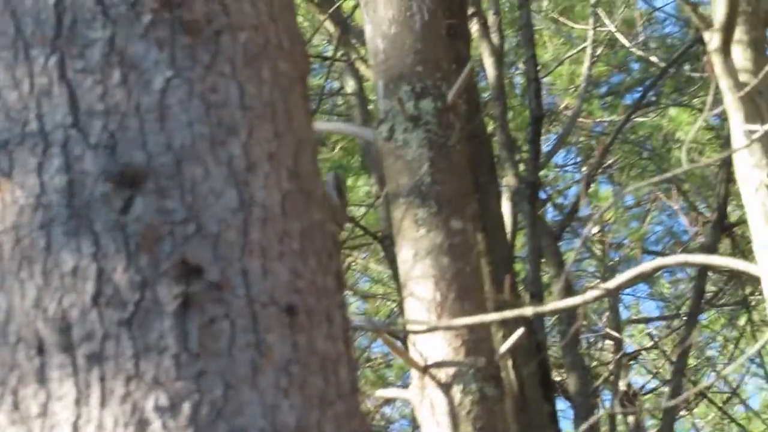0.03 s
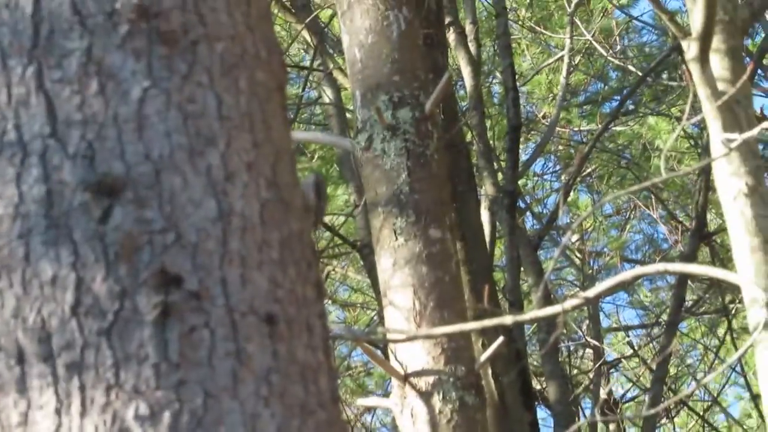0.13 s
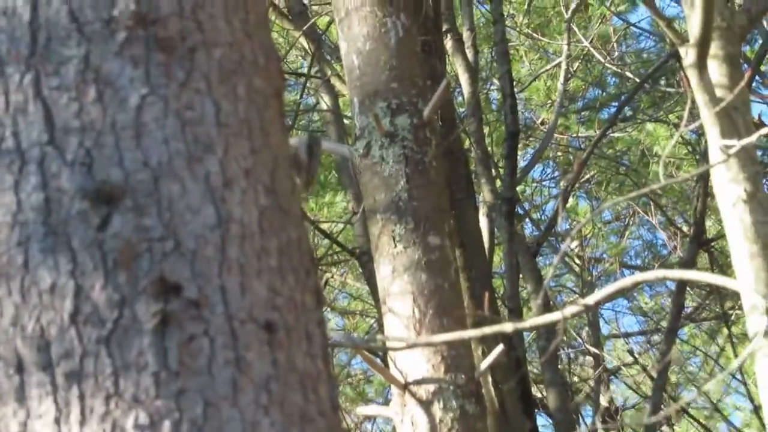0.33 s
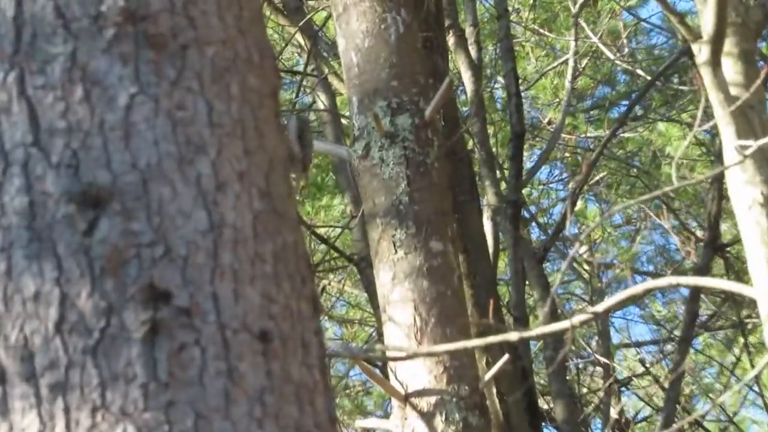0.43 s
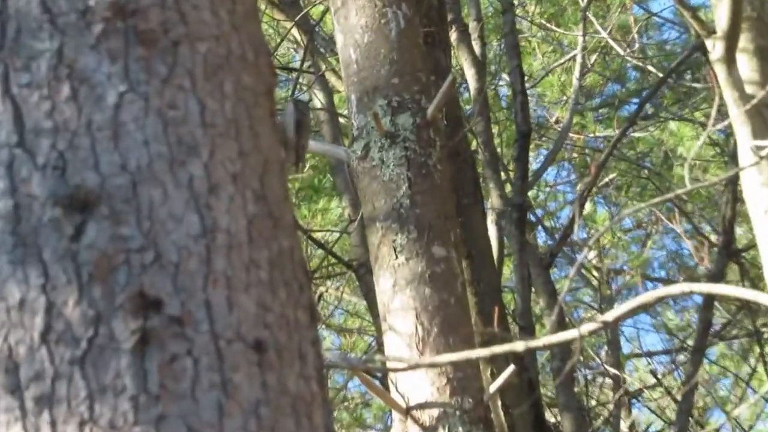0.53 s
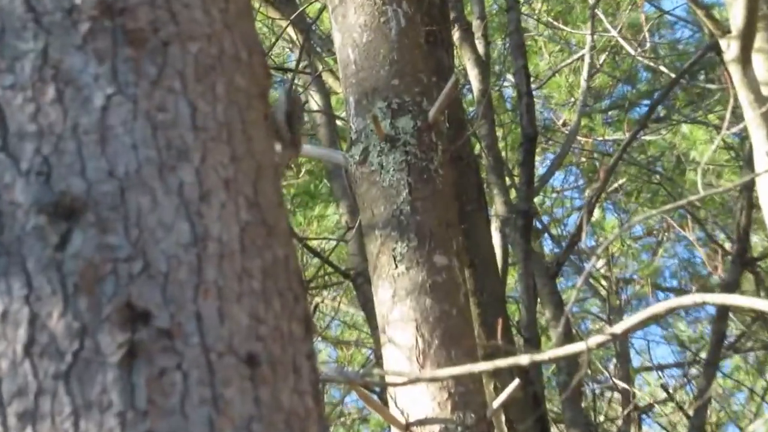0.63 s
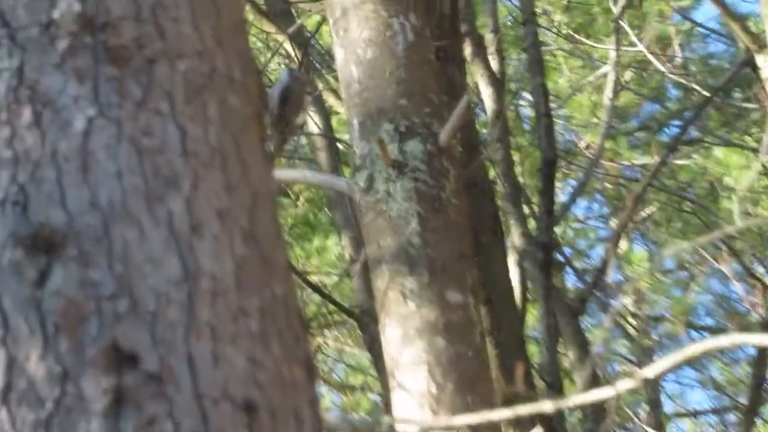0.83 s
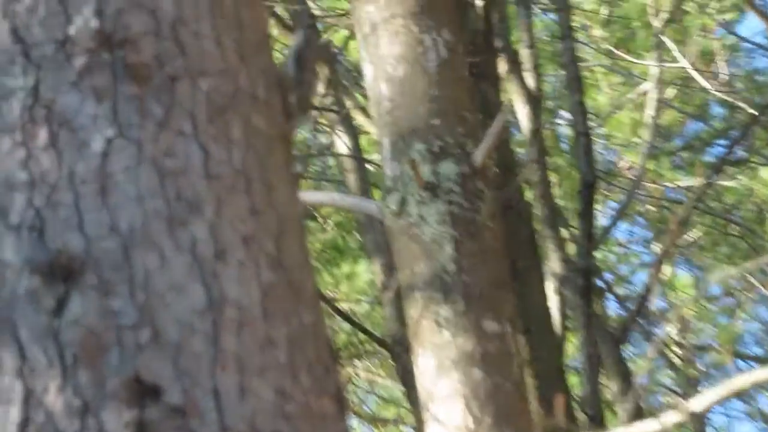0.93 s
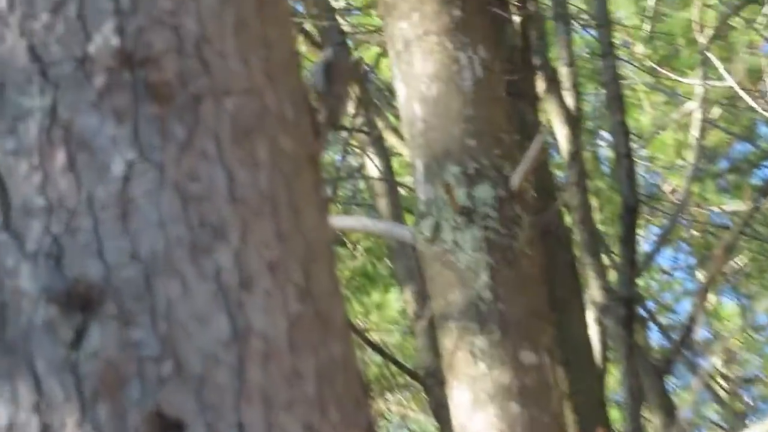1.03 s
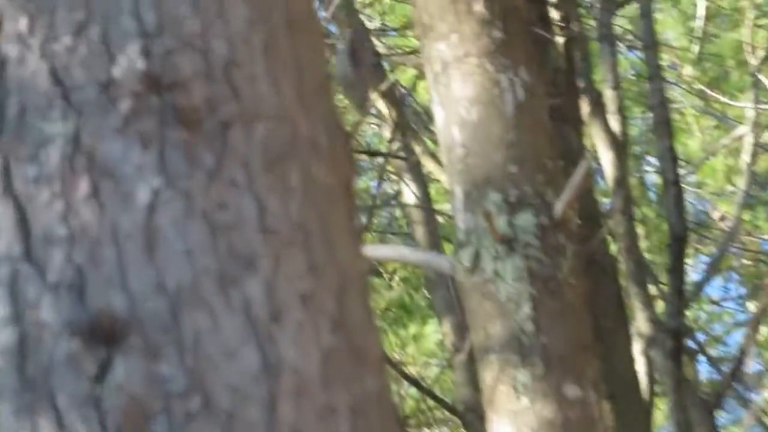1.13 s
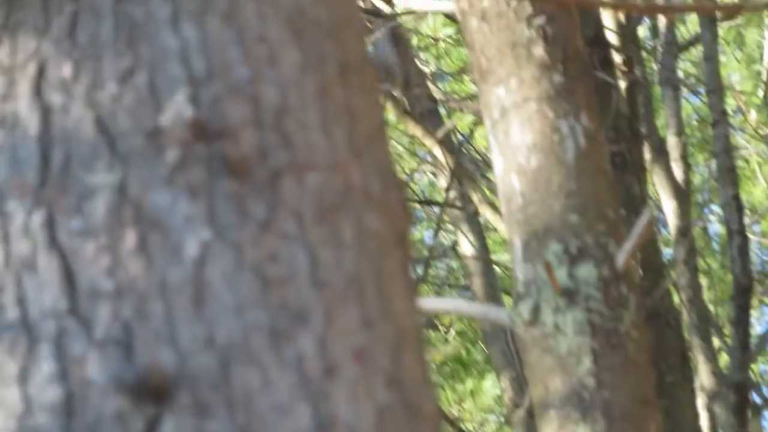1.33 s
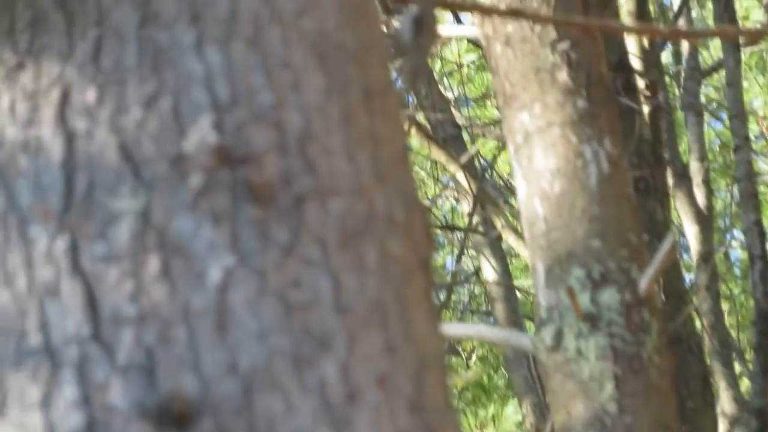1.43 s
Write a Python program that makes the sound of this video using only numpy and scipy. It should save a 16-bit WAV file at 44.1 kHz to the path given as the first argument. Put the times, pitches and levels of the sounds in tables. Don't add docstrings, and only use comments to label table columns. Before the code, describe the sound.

A camera's zoom lever gives one loud, sharp plastic snap at 0.42 seconds, bouncing briefly. Before it, from 0.1, fingers creak and tick on the casing; dull thuds peak near 0.5. Sound dips briefly, then from 0.56 a quiet motor knocks and whirrs rapidly, ending around 1.37 with a small tick. Wide low outdoor rumble, distant engine drone, faint hiss and fading leaf rustle lie underneath.

```python
import sys
import numpy as np
from scipy import signal
from scipy.fft import rfft, irfft, next_fast_len
from scipy.io import wavfile
from scipy.ndimage import uniform_filter1d, map_coordinates

SR = 44100
rng = np.random.default_rng(int(sys.argv[2]) if len(sys.argv) > 2 else 0)


def transcribe(signal):
    frames = np.atleast_2d(signal).T
    limited = np.clip(frames, -1, 1)
    pcm = np.round(limited * 32767).astype(np.int16)
    wavfile.write(sys.argv[1], SR, pcm)


def invert_db(x):
    u = np.asarray(x, float) / 20
    return 10 ** u


N = 66150

# (frequency [Hz], level [dB per Hz])
RUMBLE_MID = [(13, -48), (22, -39), (43, -3), (75, -8), (109, -4), (299, -9), (474, -14), (540, -15),
              (690, -36.5), (900, -80), (1520, -120)]
RUMBLE_SIDE = [(13, -42), (22, -13), (81, -7), (168, -4.5), (291, -9.5), (326, -9.5), (355, -8.5),
               (540, -15.5), (690, -30), (900, -63), (1520, -120)]
AIR_MID = [(400, -17), (680, -22), (815, -5), (904, -4.5), (1080, -6), (1890, -22), (6640, -28.5),
           (8160, -18.5), (14000, -20.5), (15000, -23.5)]
AIR_SIDE = [(400, -40), (680, -62), (764, -16), (964, -9.5), (1820, -31), (8710, -38.5), (12500, -43.5),
            (13400, -35), (15000, -50)]
# (middle [dB], side [dB])
RUMBLE_DB = [-56, -49.5]
AIR_DB = [-62.5, -62]
RUMBLE_GROWS_DB_PER_S = 2.2
# (frequency [Hz], level [dB per Hz])
LEAVES = [(1200, -34), (1900, 4.5), (3000, -8), (5000, -5), (7000, -7), (9000, -35)]
# (time [s], level [dB])
BREEZE = [
    (0, -67.5),
    (.5, -64.5),
    (1, -78),
    (1.5, -73),
]
# (frequency [Hz], width [Hz], level [dB])
ENGINE = [(95.8, 10, -63), (121, 8.4, -66.5)]

# (frequency [Hz], width [Hz], level [dB])
LOW = [(348, 150, -1), (506, 113, -7.5), (1030, 600, -9), (1522, 220, 3.5), (1674, 86, -5.5)]
SHELL = [(2244, 360, 0)]
MIDDLE = [(2610, 120, 2), (3096, 174, -2), (3730, 130, -10)]
BRIGHT = [(6400, 530, -4), (7540, 440, -1.5), (8600, 270, -3), (9600, 790, -4)]
TOP = [(10270, 200, -0.5), (11440, 160, -1.5), (12080, 146, 4), (13000, 780, -8.5), (13600, 280, -1),
       (14390, 110, -1)]
# (left minus right [dB], left lead [radians], likeness [0-1])
PORTS = [(-2, 1, 0.5), (5, -0.83, 0.8), (5, -0.94, 0.68), (3.5, -0.73, 1), (9.5, -0.73, 1)]

# (time [s], level [dB])
THUDS = [
    (.206, -55),
    (.315, -55),
    (0.504, -47),
    (.518, -52),
]
THUD_T60 = 0.04
# (frequency [Hz], width [Hz], level [dB])
GRIP = [(298, 136, 0.5), (535, 160, -4.5)]

# (time [s], low ring [dB], middle ring [dB], bright ring [dB])
TICKS = [(0.1034, -61, -61.5, -78), (.1565, -52, -82, -73), (.1625, -55, -77, -68), (0.1832, -51, -48, -72),
         (.2054, -43, -38, -60), (.2077, -40, -39, -62), (0.2874, -58, -60, -75), (.3128, -52, -44, -62),
         (.3153, -54, -49, -66), (.3203, -53, -45, -63), (.3228, -56, -49, -66), (.3280, -48, -47, -63),
         (.3375, -46, -51, -63), (.3446, -52, -46, -63), (.3512, -47, -49, -63), (.3570, -51, -49, -63),
         (.3605, -51, -49, -64), (.3632, -50, -54, -66), (0.4458, -50, -52, -62), (.4490, -48, -56, -65),
         (.4596, -50, -48, -57), (.4620, -52, -46, -62), (0.4782, -52, -42, -60), (.4806, -50, -43, -64),
         (0.4948, -48, -44, -73), (.5030, -45, -48, -70), (.5147, -47, -45, -70), (.5215, -48, -50, -72),
         (.5410, -58, -53, -75), (.5485, -58, -53, -75), (1.356, -66, -66, -63), (1.3777, -50, -55, -72)]
TICK_T60 = [0.013, 0.017, 0.012, 0.0097, 0.0059]
TICK_FIRM, TICK_SHELL_DB = 0.5, -3
# (time [s], level [dB])
RUB = [(0, -71), (0.091, -66.5), (.16, -63), (0.228, -59), (.28, -77), (.31, -60), (.34, -58), (.375, -68),
       (.4, -62.5), (.47, -58.5), (0.558, -67)]
RUB_DB = [1.5, -3.5, -11.5, -9.5, -29]

# (time [s], low [dB], middle [dB], bright [dB], top [dB])
SNAP = [
    (0.4224, -23, -20.5, -23.5, -30),
    (.4231, -16.5, -32.5, -33, -27.5),
    (.4237, -27.5, -24.5, -43, -27.5),
    (0.4247, -40, -40, -35.5, -44),
    (0.4271, -41, -40, -32, -44),
    (.4310, -22, -37, -51, -49),
]
SNAP_T60 = [0.0044, 0.0055, 0.0057, 0.0067]
SNAP_FIRM = [0.35, 0.86, 0.19, 0.29]
# (frequency [Hz], width [Hz], level [dB])
LEVER = [
    [(415, 108, -10), (524, 25.4, -7), (848, 57, -10.5), (1130, 160, -8), (1446, 196, -2)],
    [(2280, 144, 0.5), (2700, 150, -3.5), (3130, 87, -13), (3870, 200, -4)],
    [(4800, 400, -14.5), (6300, 440, -1), (7230, 670, -2.5), (9000, 1100, -7)],
    [(10940, 610, 1), (12360, 900, -11.5), (13560, 1000, -7)],
]
# (left minus right [dB], left lead [radians], likeness [0-1])
LEVER_PORTS = [(-5.5, 1, 0.68), (7, -1.5, 0.43), (1.5, -1.5, 0.37), (7, 3.5, 0.47)]

STEP_HZ, ZOOM_S, ZOOM_STEPS = 119.8, 0.5571, 98
CATCH_UP_S, CATCH_UP_TIME_S = 0.0012, 0.09
ZOOM_DB = [-61, -56, -61.5, -66, -61.5]
ZOOM_T60 = [0.023, 0.0071, 0.011, 0.0072, 0.0067]
STEP_FIRM = [.4, .85, .55, .35, .45]
STEP_SCATTER_DB = 1.4
# (housing ring [dB], gearbox ring [dB])
START_DB = [12, 9]
START_S = 0.07
GEAR_DB = [-6, 0, -6, -2, 3, 6]
WHIRR_DB = [-68, -78, -69, -65.5, -67.5]
WHIRR_RISE_S, WHIRR_FALL_S = 0.02, 0.02
# (frequency [Hz], width [Hz], level [dB])
HOUSING = [(2320, 140, 0)]
GEARBOX = [(2700, 210, 0), (3080, 117, 0), (3330, 120, -0.5), (3960, 210, -6), (4644, 100, -10),
           (5520, 120, -12.5)]
BARREL = [(6340, 360, -4), (7150, 510, -1), (8160, 350, 0.5), (8370, 200, 0), (9510, 570, 3.5)]
# (left minus right [dB], left lead [radians], likeness [0-1])
MOTOR_PORTS = [(0, 1, 0.83), (6, -1.2, 1), (7, -1.35, 1), (5.5, -0.57, 0.81), (10, -0.15, 0.34)]

DUCK_S, DUCK_END_S = 0.4875, 0.5571
# (level at start [dB], level at end [dB])
DUCK_DB = [-8.5, -13.5]
TOP_HZ, CLICK_TOP_HZ = 15000, 16500
# (middle [dB], side [dB])
WEAK_DB = [-9, -5]
WEAK_FROM_HZ, LOUD_DB = 4300, -40
DIP_HZ, DIP_WIDTH_HZ, DIP_DEPTH = 5120, 450, 0.45
EDGE_HZ, EDGE_DB_PER_KHZ = 14000, -4


def unit(x):
    return x / np.sqrt(np.mean(x ** 2) + 1e-20)


def filtered(x, response):
    m = next_fast_len(N + 8192)
    return irfft(rfft(x, m) * response(np.fft.rfftfreq(m, 1 / SR)), m)[..., :N]


def wobble(rate):
    knots = rng.standard_normal(int(N * rate / SR) + 4)
    return map_coordinates(knots, [np.arange(N) * rate / SR])


def shaped(points):
    f, db = np.transpose(points)
    noise = rng.standard_normal(N)
    return unit(filtered(noise, lambda hz: invert_db(np.interp(np.log(hz + 1), np.log(f + 1), db))))


def ring(modes, f):
    return sum((-1) ** k * invert_db(db) * 1j * f * w / (c * c - f * f + 1j * f * w)
               for k, (c, w, db) in enumerate(modes))


def body(modes, f):
    lo, hi = modes[0][0], modes[-1][0]
    centre = np.sqrt(lo * hi)
    return ring(modes, f) * ring([(centre, hi - lo + 0.8 * centre, 0)], f)


def outdoors():
    swell = invert_db(1.23 * wobble(3.95) + RUMBLE_GROWS_DB_PER_S * (np.arange(N) - N / 2) / SR)
    mid = invert_db(RUMBLE_DB[0]) * swell * shaped(RUMBLE_MID) + invert_db(AIR_DB[0]) * shaped(AIR_MID)
    side = invert_db(RUMBLE_DB[1]) * swell * shaped(RUMBLE_SIDE) + invert_db(AIR_DB[1]) * shaped(AIR_SIDE)
    return np.array([mid + side, mid - side])


def drone():
    out = 0
    for hz, width, db in ENGINE:
        tone = filtered(rng.standard_normal(N), lambda f: ring([(hz, width, 0)], f) ** 2)
        out = out + invert_db(db) * unit(tone)
    return out


def leaves():
    breeze = invert_db(np.interp(np.arange(N) / SR, *np.transpose(BREEZE)))
    return breeze * np.array([shaped(LEAVES), shaped(LEAVES)])


def knocks(times, db, t60, firm):
    starts = np.bincount(np.round(np.asarray(times) * SR).astype(int), invert_db(db), N)
    fall = invert_db(-60 * np.arange(SR // 20) / SR / t60)
    firm = np.clip(firm, 0, 1)
    scrape = np.sqrt(1 - firm) * signal.fftconvolve(starts, fall)[:N]
    blows = np.sqrt(firm) * np.linalg.norm(fall) * starts
    return np.array([scrape, blows])


def casing(forces, rings, ports):
    out = 0
    for (scrape, blows), modes, (pan_db, lead, alike) in zip(forces, rings, ports):
        a, b = rng.standard_normal((2, N))
        u = np.arccos(np.clip(alike, 0, 1)) / 2
        noise = np.array([np.cos(u) * a + np.sin(u) * b, np.cos(u) * a - np.sin(u) * b])
        pair = scrape * noise + blows
        power = np.mean(np.abs(body(modes, np.linspace(1, SR / 2, num=4000))) ** 2)
        port = (invert_db(pan_db / 2) * np.exp(0.5j * lead)) ** np.array([[1], [-1]])
        out = out + filtered(pair, lambda f: port * body(modes, f) / np.sqrt(power))
    return out


def grip():
    return casing([knocks(*np.transpose(THUDS), THUD_T60, 0.44)], [GRIP], [(-1.2, 0.94, 0.3)])


def fingers():
    s, low, middle, bright = np.transpose(TICKS)
    rub_level = np.interp(np.arange(N) / SR, *np.transpose(RUB), right=-120)
    rub = invert_db(rub_level + 4.5 * wobble(89.2)) * [[1], [0]]
    levels = low, middle + TICK_SHELL_DB, middle, bright, bright
    forces = [knocks(s, db, t60, TICK_FIRM) + invert_db(rub_db) * rub
              for db, t60, rub_db in zip(levels, TICK_T60, RUB_DB)]
    return casing(forces, (LOW, SHELL, MIDDLE, BRIGHT, TOP), PORTS)


def lever():
    s, *levels = np.transpose(SNAP)
    forces = [knocks(s, *row) for row in zip(levels, SNAP_T60, SNAP_FIRM)]
    return casing(forces, LEVER, LEVER_PORTS)


def zoom_motor():
    t = np.arange(N) / SR
    steps = np.arange(ZOOM_STEPS) / STEP_HZ
    times = ZOOM_S + steps - CATCH_UP_S * (1 - np.exp(-steps / CATCH_UP_TIME_S))
    slack = np.exp(-steps / START_S)
    gear_db = np.resize(GEAR_DB, ZOOM_STEPS)
    extra = [0, START_DB[0] * slack, START_DB[1] * slack, 0.4 * gear_db, gear_db]
    rise = (t - ZOOM_S) / WHIRR_RISE_S
    fall = 1 + (times[-1] - t) / WHIRR_FALL_S
    running = np.clip(np.minimum(rise, fall), 0, 1) * [[1], [0]]
    forces = []
    for zoom_db, whirr_db, t60, more, firm in zip(ZOOM_DB, WHIRR_DB, ZOOM_T60, extra, STEP_FIRM):
        whirr = running * invert_db(whirr_db + 2.34 * wobble(24.98))
        step_db = zoom_db + more + rng.normal(0, STEP_SCATTER_DB, ZOOM_STEPS)
        forces.append(whirr + knocks(times, step_db, t60, firm))
    return casing(forces, (LOW, HOUSING, GEARBOX, BARREL, TOP), MOTOR_PORTS)


def scene():
    air = outdoors() + drone() + leaves()
    handling = grip() + fingers()
    return filtered(air + handling + zoom_motor(), lambda hz: hz < TOP_HZ) + lever()


def thinned(x):
    hz, _, z = signal.stft([x[0] + x[1], x[0] - x[1]], SR, nperseg=2048)
    z = z[:, :-1]
    f = hz[:-1, None]
    power = np.mean(np.abs(z.reshape(2, -1, 4, z.shape[-1])) ** 2, axis=2)
    bands = np.repeat(power, 4, axis=1)
    treble = np.mean(bands[0, (hz[:-1] > WEAK_FROM_HZ) & (hz[:-1] < TOP_HZ)], axis=0)
    dip = np.abs(1 - DIP_DEPTH * ring([(DIP_HZ, DIP_WIDTH_HZ, 0)], f)) ** 2
    dip = dip * invert_db(2 * EDGE_DB_PER_KHZ * np.clip(f - EDGE_HZ, 0, None) / 1000)
    loud = treble > invert_db(2 * LOUD_DB) / len(hz)
    strong = bands * dip > invert_db(2 * np.reshape(WEAK_DB, (2, 1, 1))) * treble
    keep = (f < WEAK_FROM_HZ) | (strong & (f < TOP_HZ)) | loud
    kept = np.pad(z * keep, ((0, 0), (0, 1), (0, 0)))
    mid, side = signal.istft(kept, SR, nperseg=2048)[1][:, :N] / 2
    return np.array([mid + side, mid - side])


def roll_off(x):
    return signal.sosfilt(signal.butter(12, 16670, fs=SR, output="sos"), x)


def record(dry):
    t = np.arange(N) / SR
    duck = invert_db(np.interp(t, [DUCK_S, DUCK_END_S], DUCK_DB))
    gain = uniform_filter1d(np.where((t > DUCK_S) & (t < DUCK_END_S), duck, 1.0), size=20)
    limit = lambda hz: np.where(hz < TOP_HZ, 1, invert_db(-14)) * (hz < CLICK_TOP_HZ)
    mix = thinned(filtered(dry * gain, limit))
    return roll_off(mix)


dry = scene()
out = record(dry)
transcribe(out)
```